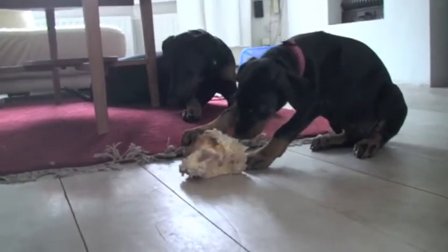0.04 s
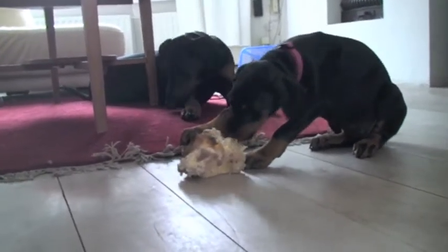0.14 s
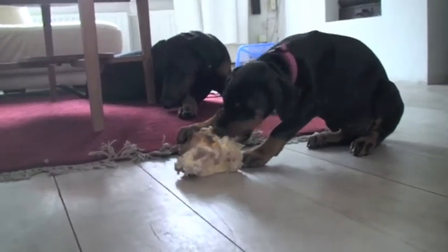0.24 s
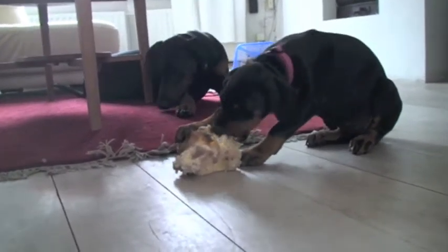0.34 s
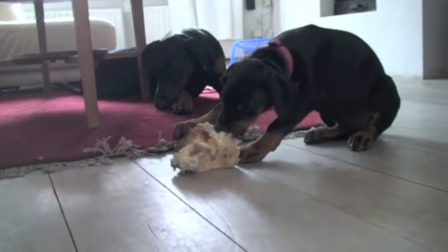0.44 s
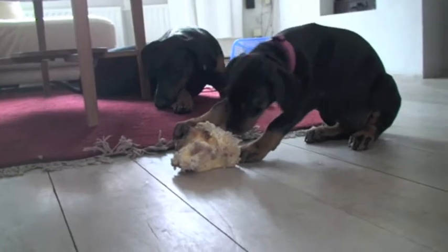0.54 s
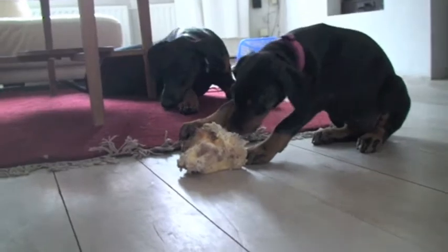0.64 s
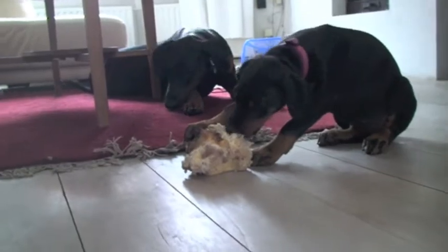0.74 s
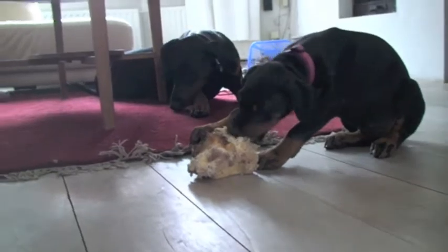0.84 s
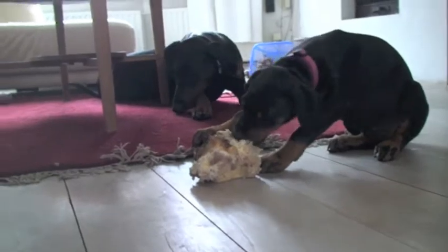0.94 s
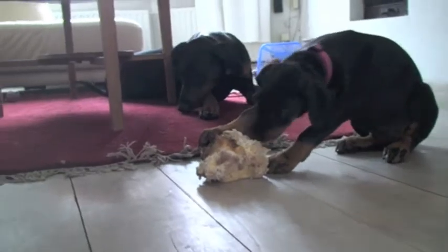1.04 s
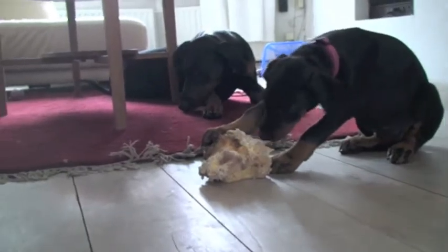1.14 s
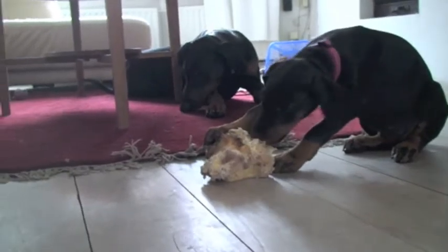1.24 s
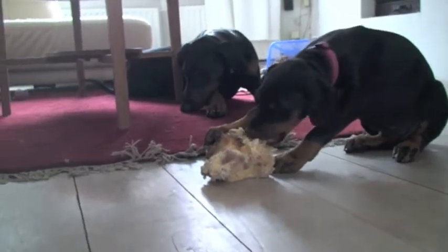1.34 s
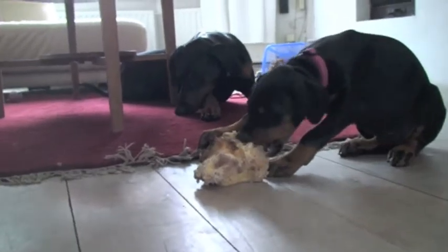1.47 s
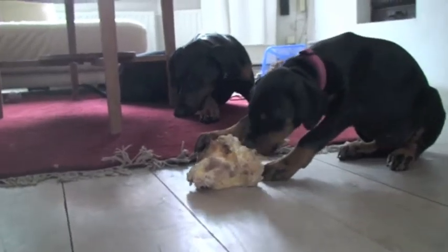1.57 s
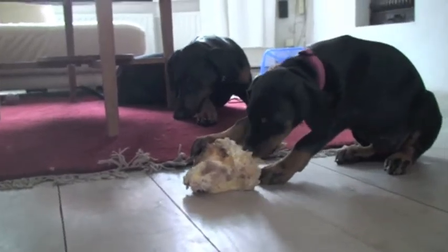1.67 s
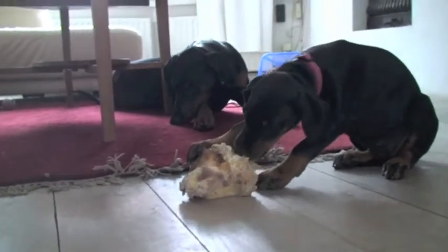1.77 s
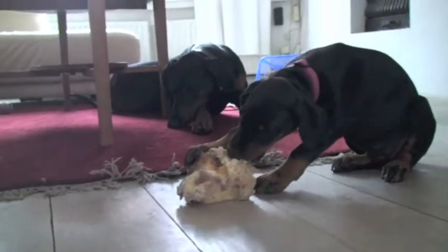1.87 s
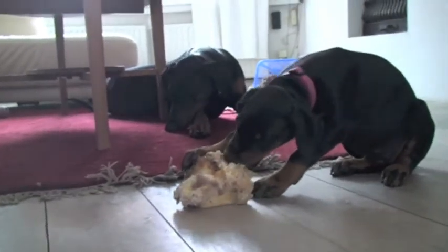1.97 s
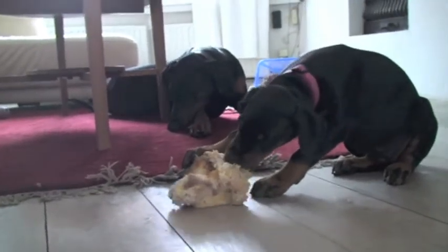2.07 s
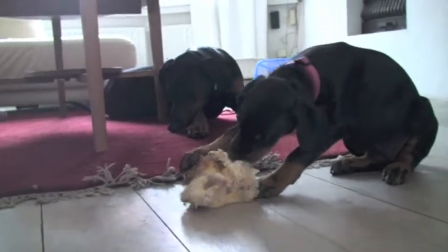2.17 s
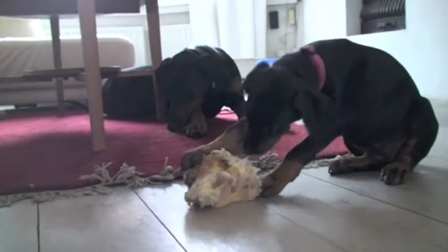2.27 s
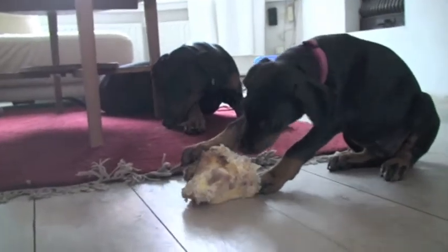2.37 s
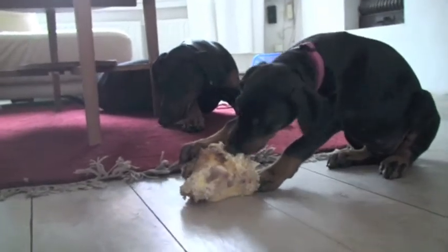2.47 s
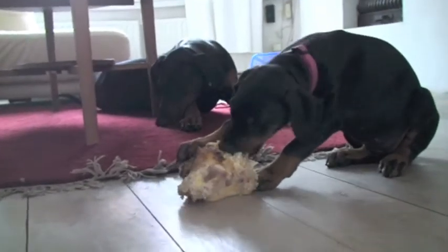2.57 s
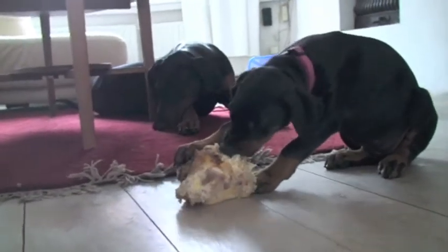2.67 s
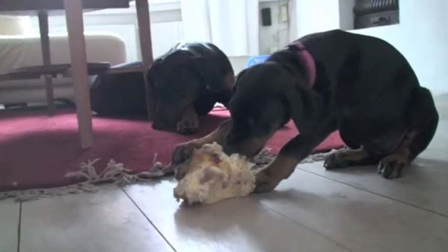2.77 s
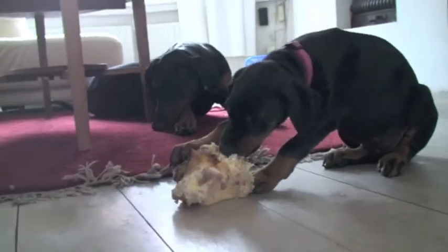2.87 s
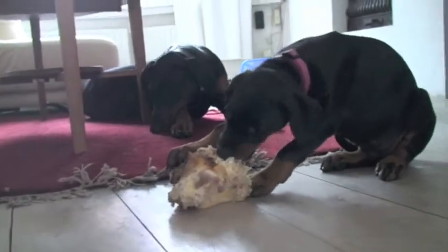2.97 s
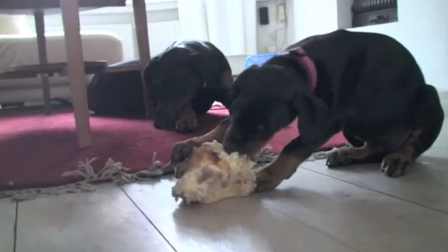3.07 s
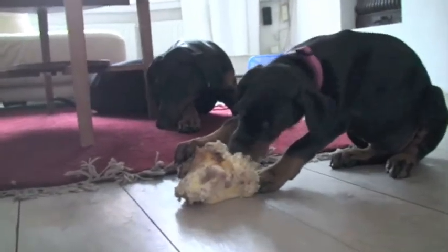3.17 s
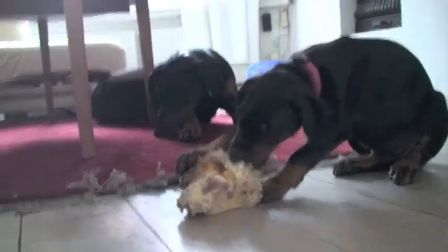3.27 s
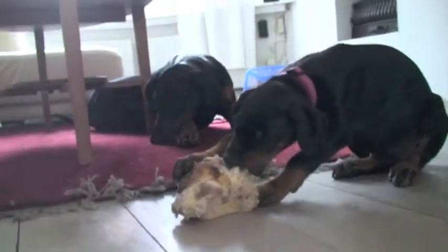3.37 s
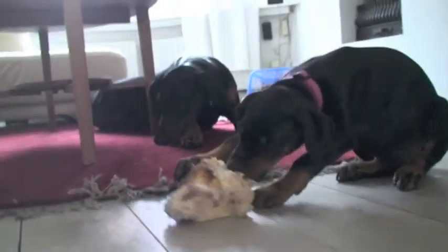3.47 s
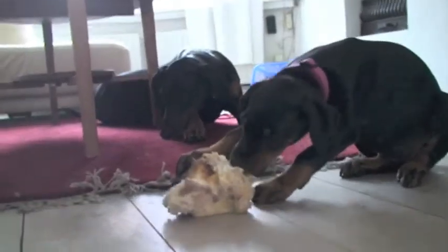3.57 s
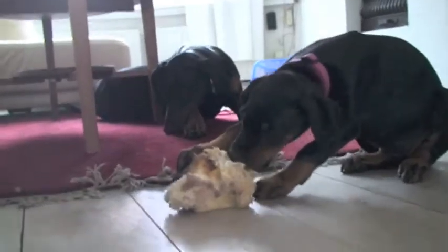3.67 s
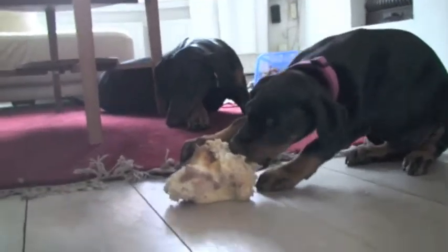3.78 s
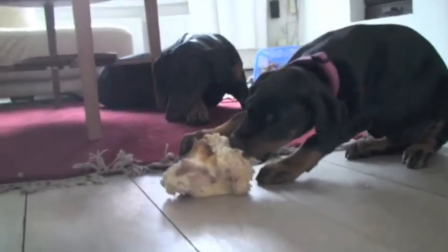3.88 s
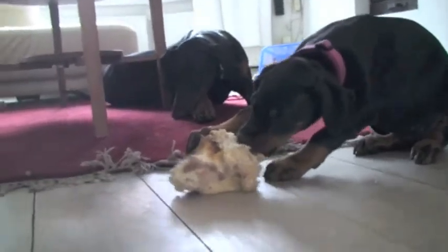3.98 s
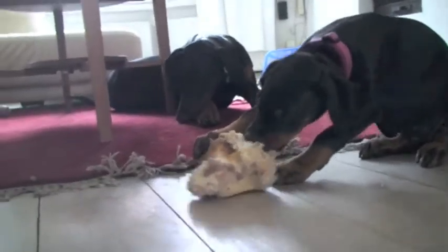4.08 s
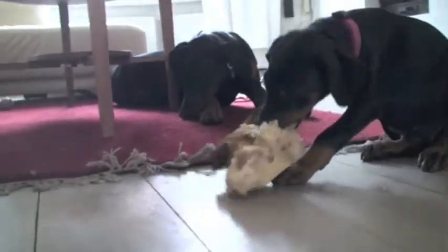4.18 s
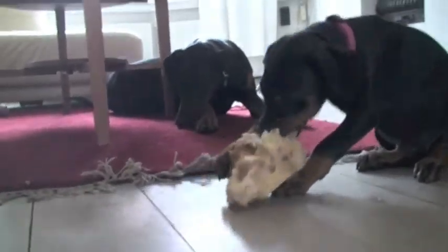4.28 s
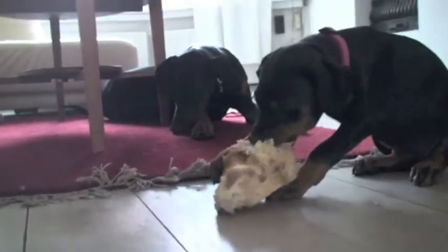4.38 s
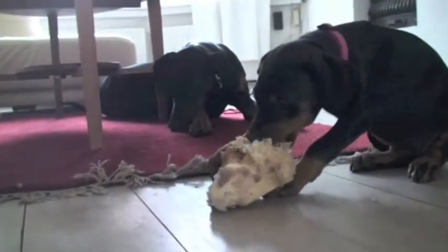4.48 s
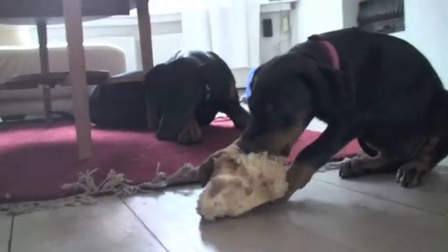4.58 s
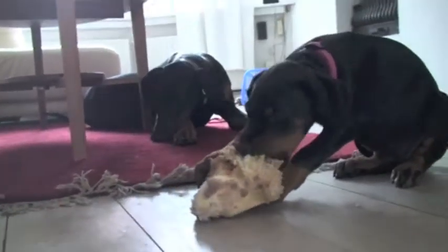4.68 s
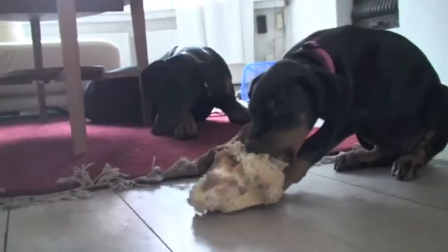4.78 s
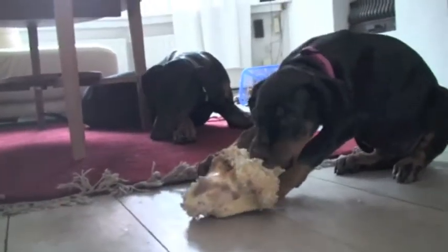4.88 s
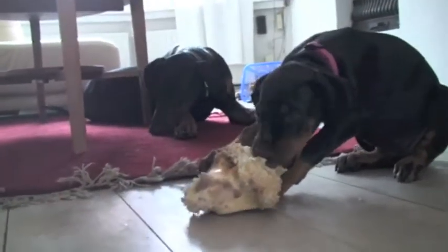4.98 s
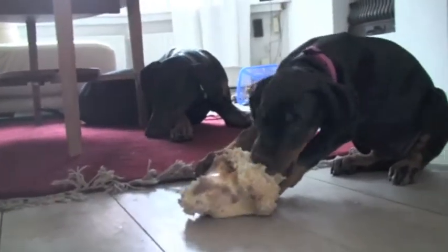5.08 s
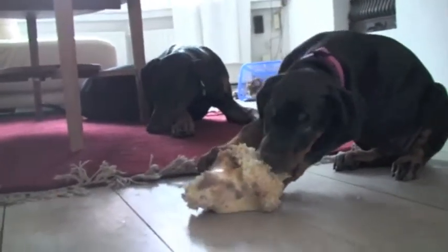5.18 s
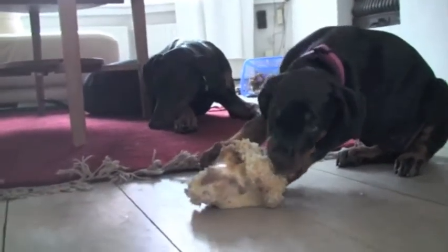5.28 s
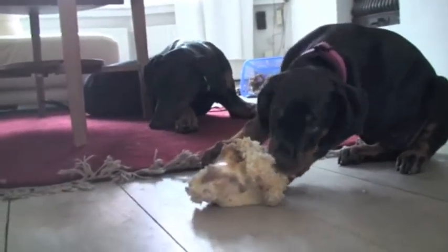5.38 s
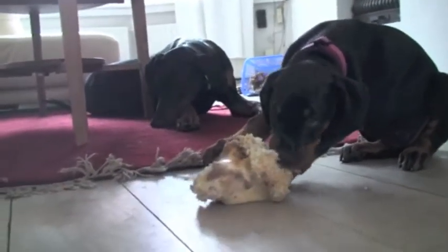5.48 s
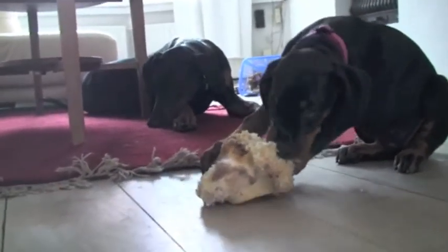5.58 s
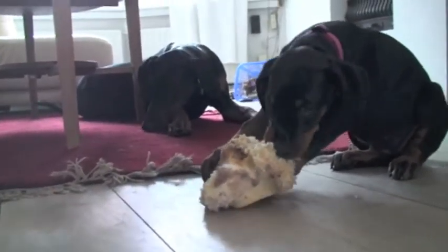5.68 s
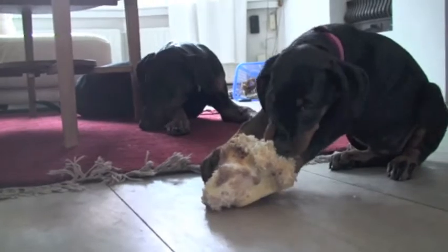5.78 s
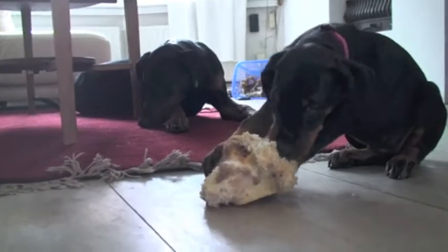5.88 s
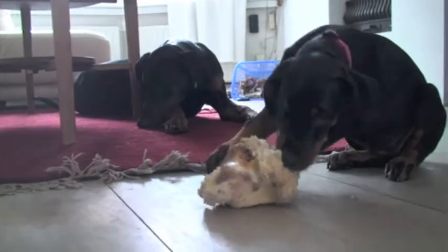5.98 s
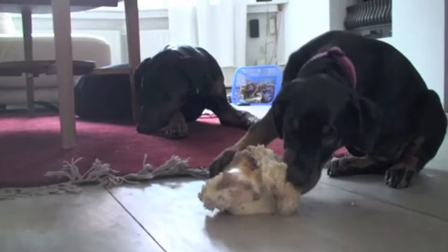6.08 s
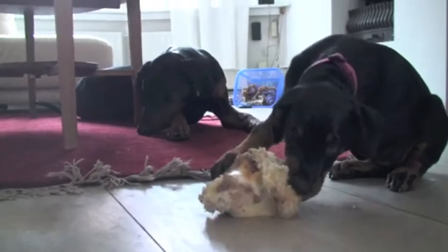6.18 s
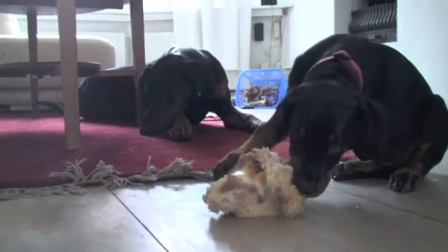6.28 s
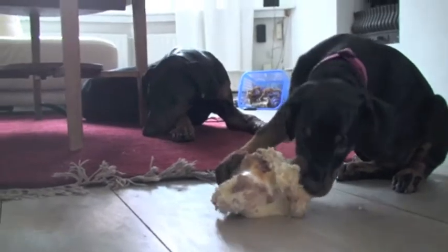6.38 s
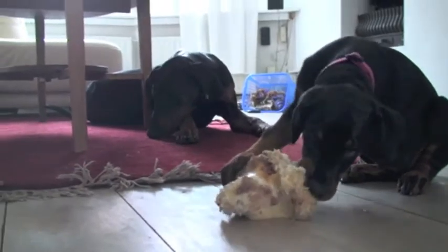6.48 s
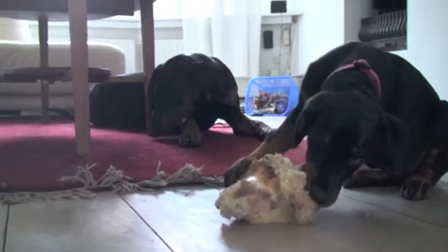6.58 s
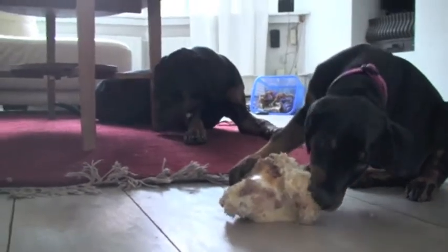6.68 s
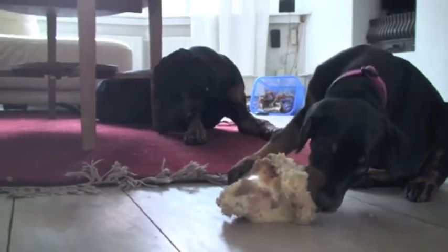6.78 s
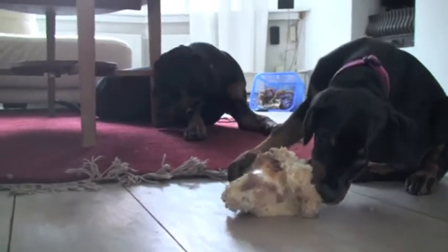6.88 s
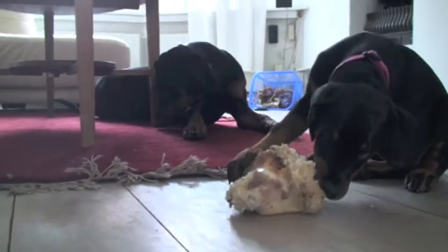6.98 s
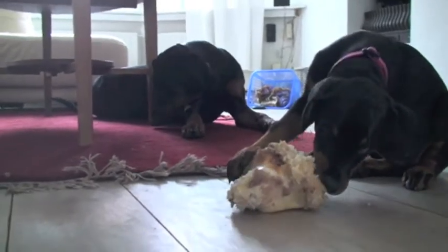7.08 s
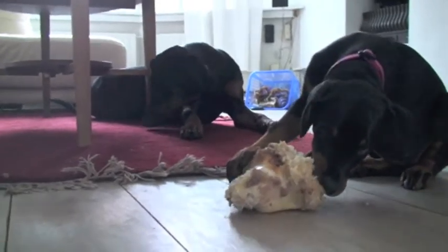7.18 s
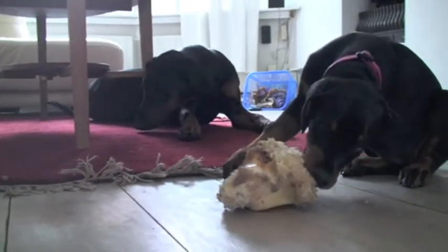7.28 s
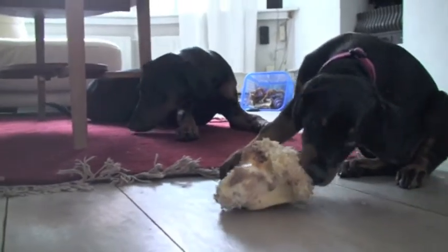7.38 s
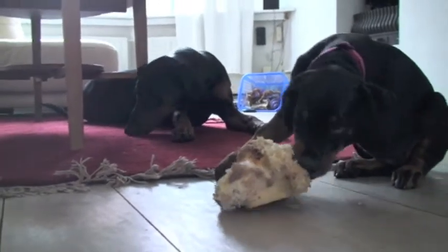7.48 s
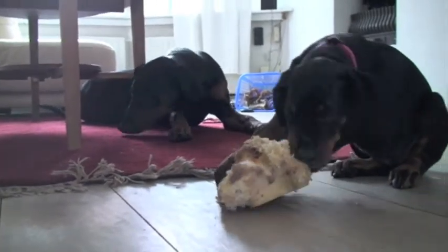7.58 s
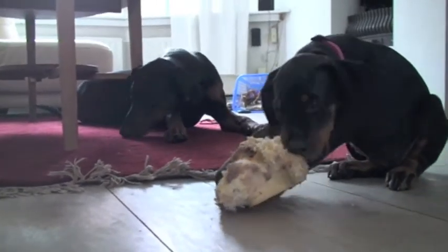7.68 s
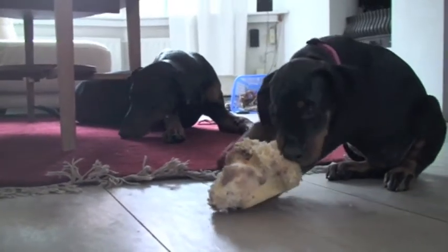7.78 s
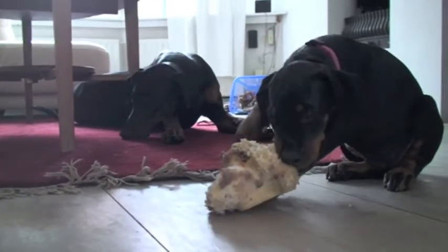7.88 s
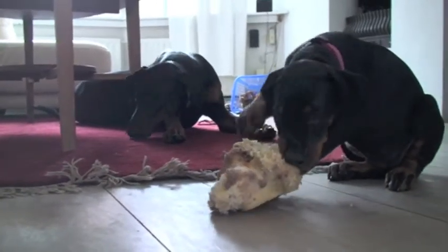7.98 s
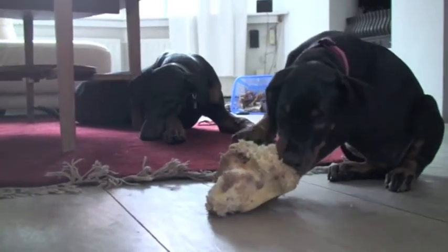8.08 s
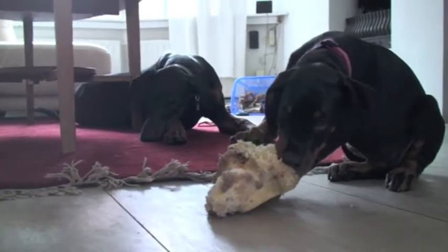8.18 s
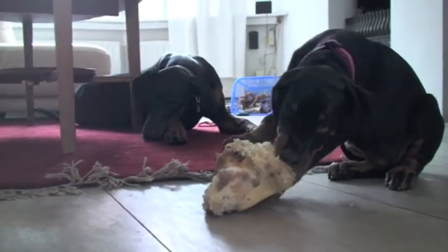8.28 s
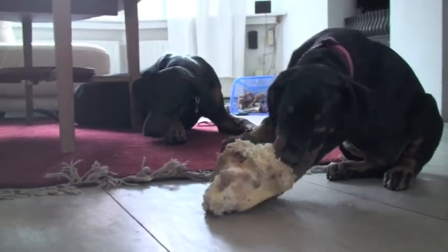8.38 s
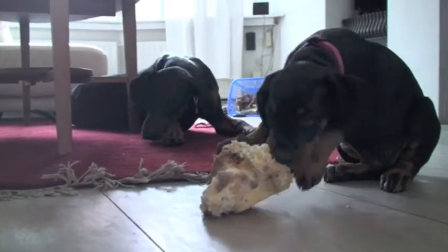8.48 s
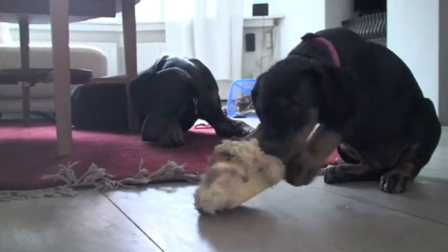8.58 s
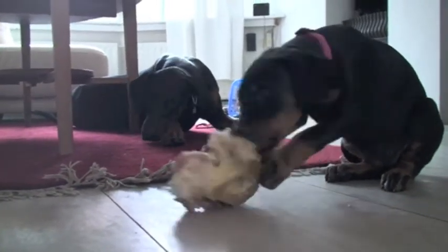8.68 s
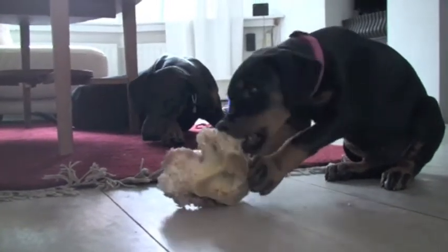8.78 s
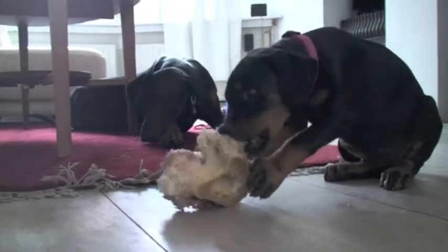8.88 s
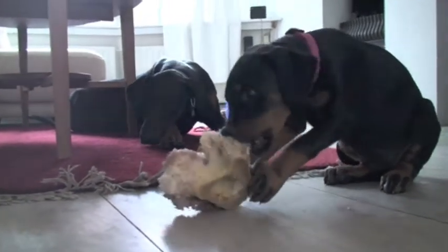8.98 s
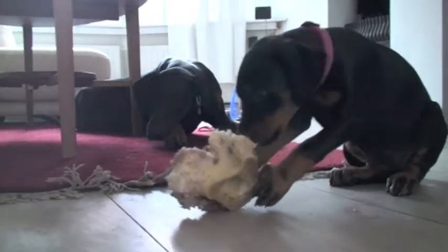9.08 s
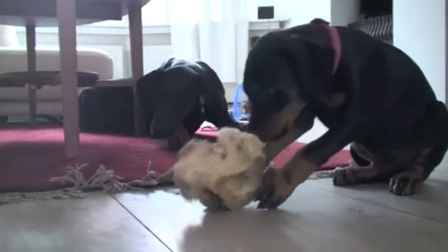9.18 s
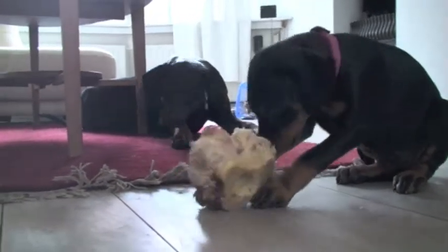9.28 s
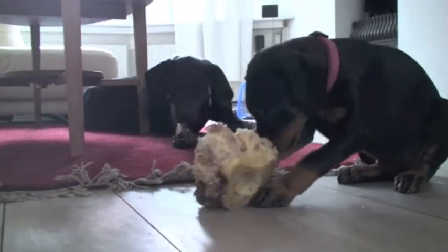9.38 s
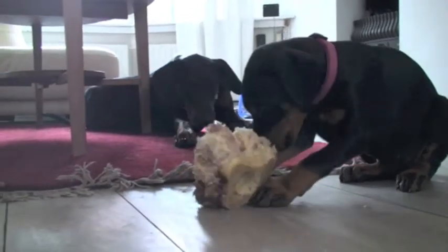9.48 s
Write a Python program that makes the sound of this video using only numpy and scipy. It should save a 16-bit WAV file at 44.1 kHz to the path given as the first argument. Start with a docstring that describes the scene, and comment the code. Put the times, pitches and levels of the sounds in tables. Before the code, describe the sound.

A dog gnaws a large bone on a hard floor, heard very close, in a quiet, lightly echoing room with soft hush and a barely audible steady high tone. From 0 to 2 seconds there are airy nose puffs, small bright tooth ticks and faint rubbing. At about 2.2 the bone knocks hollowly with a short scrape; near 2.7 come a tiny soft groan and a squeaky wet click. Smacks follow at 3 to 3.3, knocks at 3.5. From 3.9 to 5 it gets busy: grinding drags, a strong scrape and puff at 4.2, a solid knock at 4.6, crisp clicks at 4.9. Dragging returns at 5.5, then the loudest, sharp knock at 6.1. Lighter ticks and bumps continue through 7, a low thud lands at 8.1, dull bumps follow, and at 9.2 to 9.4 a rough scrape, knocks and snuffling end it.

```python
"""A quiet room with a board floor: a dog gnaws a large bone close to a microphone lying on the same boards.
Behind it lie a still hush and a thin steady tone; sparse echoes of random sign make the room answer.
Air hisses in the nose as noise in a moving resonance, and a soft groan is a wavering stack of sines.
Teeth, tongue and mouth tick and smack as short snaps with gritty rings.
The bone knocks and grinds on the boards: blows and uneven slips set off dying sines, one for each mode."""
import sys
import numpy as np
from scipy import signal
from scipy.fft import rfft, irfft
from scipy.io import wavfile
from scipy.ndimage import uniform_filter1d

SR = 44100
rng = np.random.default_rng(int(sys.argv[2]) if len(sys.argv) > 2 else 0)


def wav_record(signal):
    """Record a signal, one row per channel, as 16-bit PCM in the file named by sys.argv[1]."""
    frames = np.transpose(np.atleast_2d(signal))
    bounded = np.clip(frames, -1, 1)
    # unit amplitude maps onto the largest positive 16-bit level
    quanta = np.round(bounded * 32767).astype(np.int16)
    wavfile.write(sys.argv[1], SR, quanta)


N = 420713  # length in samples


def gain_of(db):
    """Decibels to gain."""
    return 10 ** (np.asarray(db) / 20)


def evened(x):
    """Scales to rms 1."""
    return x / np.sqrt(np.mean(x ** 2) + 1e-20)


def read(points, hz):
    """Reads a table on a log-frequency axis."""
    f, value = np.transpose(points)
    return np.interp(np.log(hz + 1), np.log(f + 1), value)


def add(mix, s, sound):
    """Mixes a sound in at s seconds, cut off at the end of the mix."""
    part = mix[..., round(s * SR):][..., :sound.shape[-1]]
    part += sound[..., :part.shape[-1]]


def resonate(x, hz, width):
    """A resonance of gain 1: shifts hz down to zero, smooths, and shifts back; hz may be a moving curve."""
    turn = np.exp(2j * np.pi * np.cumsum(hz * np.ones(len(x))) / SR)
    r = np.exp(-np.pi * width / SR)
    return 2 * (turn * signal.lfilter([1 - r], [1, -r], x / turn)).real


def leaned(lean_db):
    """Gains for left and right that share out a lean in dB, left minus right."""
    return gain_of(lean_db * np.array([.5, -.5])[:, None, None])


# Colour of the still room. Each row: frequency in Hz, relative level in dB per Hz.
HUSH = [(12, -44.5), (20, -6.5), (65, -1), (301, -0.5), (459, 1), (698, 0), (759, 3), (1000, -2.5),
        (1220, 0), (1860, -6.5), (2530, -7.5), (3070, -10), (11800, -23), (14300, -20.5), (16000, -42)]
# How alike the hush is at both ports. Each row: frequency in Hz, likeness (0-1).
HUSH_SAME = [(60, 0.145), (180, 0.263), (550, 0.296), (1650, 0.279), (4970, 0.059), (15000, 0.11)]
# Lean of the hush, used for the far echo too. Each row: frequency in Hz, left minus right in dB.
HUSH_LEAN = [(60, -20.5), (120, -3), (240, 0.5), (480, 5), (950, 4), (1890, 4.5), (3770, 3.5), (7520, 2.5),
             (15000, -5)]
HUSH_DB = -52  # rms over both channels


def hush():
    """The still room: random short-time spectra, partly alike at both ports, with faint drifting patches."""
    frames, hz = N // 256 + 5, np.fft.rfftfreq(1024, 1 / SR)
    a, b, c, d, patches = rng.standard_normal((frames, 513, 5)).T
    patches = evened(uniform_filter1d(uniform_filter1d(patches, 12, 0), 14, 1))
    same = read(HUSH_SAME, hz)[:, None]
    left = a + 1j * b
    right = same * left + np.sqrt(1 - same ** 2) * (c + 1j * d)
    z = np.array([left, right]) * gain_of(read(HUSH, hz)[:, None] + 1.896 * patches)
    z *= leaned(read(HUSH_LEAN, hz)[:, None])
    return gain_of(HUSH_DB) * evened(signal.istft(z, nperseg=1024, noverlap=768)[1][:, :N])


WHINE_HZ, WHINE_DB = 2522.5, -72.5  # level is rms


def whine():
    """A thin steady tone: one sine."""
    return gain_of(WHINE_DB) * np.sqrt(2) * np.sin(2 * np.pi * WHINE_HZ * np.arange(N) / SR)


# How the ports weigh a near source. Each row: frequency in Hz, left minus right in dB.
NEAR_LEAN = [(60, -13.5), (110, -14.5), (200, -8), (380, -4.5), (700, -2.5), (1290, -4.5), (2380, -9),
             (4400, -13), (8120, -3), (15000, 1)]
# Phase between the ports. Each row: frequency in Hz, radians by which the left leads.
NEAR_LEAD = [(60, -1.2), (340, -1.49), (700, -0.975), (1200, -1.21), (2500, -1.41), (6000, 1), (12000, 1)]


def ports(x):
    """Two microphone ports hear a near source with their own lean and phase; their mean keeps the level."""
    hz = np.fft.rfftfreq(N, 1 / SR)
    left = gain_of(read(NEAR_LEAN, hz)) * np.exp(1j * read(NEAR_LEAD, hz))
    both = np.array([left, np.ones_like(left)])
    return irfft(rfft(x) * both * 2 / abs(1 + left), N)


# Length of the echo. Each row: frequency in Hz, time to fall 60 dB in seconds.
ROOM = [(60, 0.654), (200, 0.559), (700, 0.629), (2000, 0.773), (5000, 0.262), (12000, 0.31)]
# Strength of the echo. Each row: frequency in Hz, echo against direct sound in dB.
ROOM_DB = [(60, -1.5), (300, -8.5), (700, -12), (1100, -7.5), (1600, -9), (2500, -2), (4000, -0.5),
           (10000, -28)]
# Echo from the dog's side. Each row: frequency in Hz, share of the echo's power (0-1).
ROOM_NEAR = [(60, 0.72), (300, 0.14), (1000, 0.8), (3000, 0.62)]


def room(x):
    """Sparse taps of random sign swell in over some milliseconds; each band dies at its own speed."""
    taps = np.zeros((3, SR))  # left, right, the dog's side
    at = np.arange(300, SR - 20, 20) + rng.integers(0, 20, (3, (SR - 301) // 20))
    np.put_along_axis(taps, at, rng.choice([-1., 1.], at.shape), 1)
    hz, t, z = signal.stft(taps, SR, nperseg=256)
    t60, share = read(ROOM, hz)[:, None], read(ROOM_NEAR, hz)[:, None]
    swell = 1 - np.exp(-t / 0.0131)
    z *= gain_of(read(ROOM_DB, hz)[:, None] - 60 * t / t60) * swell
    z /= np.sqrt(t60 * 2000 / np.log(1e6))  # a longer echo is not a stronger one
    z[:2] *= np.sqrt(1 - share) * leaned(read(HUSH_LEAN, hz)[:, None])
    z[2] *= np.sqrt(share)
    wet = signal.oaconvolve(x[None], signal.istft(z, SR, nperseg=256)[1], axes=1)[:, :N]
    return wet[:2] + ports(wet[2])


# First returns from nearby surfaces. Each row: delay in seconds, level against the direct sound in dB.
ECHOES = [(0.0151, -29.5), (0.0185, -22.5), (.034, -23)]


def walls(x):
    """Single echoes from the nearest walls and furniture, added to the direct sound."""
    out = x.copy()
    for s, db in ECHOES:
        add(out, s, gain_of(db) * x)
    return out


# A soft groan as a curve. Each row: time in seconds, pitch in Hz, rms level of the fundamental in dB.
GROAN = [(2.6, 295.4, -64), (2.644, 282.3, -58), (2.666, 237.9, -55.5), (2.754, 238.3, -56),
         (2.782, 310, -64.5), (2.83, 253.3, -57), (2.86, 256, -66)]


def groan():
    """A soft closed-mouth groan: a wavering fundamental with weak overtones; gives its start and sound."""
    s, hz, db = np.transpose(GROAN)
    t = np.arange(s[0], s[-1], 1 / SR)
    waver = 1 + 1.005 * uniform_filter1d(rng.standard_normal(len(t)), 200)
    turns = np.cumsum(np.interp(t, s, hz) * waver) / SR
    voice = sum(gain_of(-9. * k) * np.sin(2 * np.pi * (k + 1) * turns) for k in range(4))
    fade = signal.windows.tukey(len(t), .2)
    return s[0], np.sqrt(2) * gain_of(np.interp(t, s, db)) * voice * fade


# Puffs of air through nose and lips. Each row: peak time in seconds, rise and fall in seconds per 20 dB,
# level in dB, centre in Hz, level of the topmost hiss in dB, narrowing of the nostrils (0-1).
PUFFS = [(.003, .1, 0.16, -57.5, 5600, -65, 0), (.32, 0.187, .2, -66, 6500, -65, .3),
         (.5, 0.161, 0.253, -56, 6100, -61.5, 0), (1.09, 0.276, 0.102, -59, 6243, -62.5, 0.095),
         (1.72, 0.293, 0.1343, -56, 6240, -67, 0.026), (2.23, 0.2557, 0.121, -54.5, 5900, -56.5, 0.049),
         (2.36, 0.289, 0.62, -64, 4980, -77.5, 0.023), (2.56, 0.09, 0.33, -63, 6100, -64, 0),
         (2.74, 0.052, 0.037, -48.5, 5480, -69, 0), (2.87, 0.213, 0.71, -58, 5728, -62.5, 0.13),
         (3.21, 0.024, 0.3, -62.5, 5200, -61, 0.089), (3.5, 0.176, 0.22, -62.5, 6300, -59, 0.32),
         (3.75, 0.27, 0.099, -60.5, 5760, -63.5, 0), (3.85, 0.033, 0.2057, -62, 6100, -60.5, 0.029),
         (3.96, 0.157, 0.051, -55.5, 6666, -59.5, 0.074), (4.09, .4, 0.1852, -59.5, 5800, -60, 0),
         (4.215, 0.111, 0.138, -43.5, 4340, -64, 0.53), (4.33, 0.0844, 0.204, -51, 5300, -61, 0.17),
         (4.51, 0.04, 0.083, -60, 5950, -68.5, 0.11), (4.62, 0.32, 0.57, -67, 5373, -65.5, 0.17),
         (4.82, 0.053, 0.24, -61, 5900, -56.5, 0.38), (4.94, 0.134, 0.081, -52.5, 6850, -61, 0.31),
         (5.001, 0.11, 0.214, -53, 6730, -70, 0.071), (5.39, 0.044, 0.051, -59, 5240, -58.5, 0.55),
         (5.45, 0.025, 0.084, -53.5, 6788, -56, 0.22), (5.66, 0.347, 0.89, -60, 5438, -59, 0.366),
         (5.8, 0.32, 0.43, -57.5, 4830, -61, 1), (6.08, 0.47, 0.137, -63.5, 4860, -70, 0),
         (6.24, 0.39, 0.52, -63, 4710, -72.5, 0.013), (6.69, 0.404, 0.1634, -58, 5730, -68, 0.0065),
         (6.89, 0.178, 0.423, -59.5, 5464, -58.5, 0.33), (7.08, 0.421, 0.4084, -68, 4975, -76.5, 0.36),
         (7.41, .2, 0.19, -61, 6180, -60.5, 0.3), (7.86, 0.79, 0.063, -63, 5030, -64.5, 0.43),
         (7.99, 0.25, .5, -65, 5237, -68, 0.5), (8.42, 0.47, 0.38, -64.5, 5770, -64.5, 0.13),
         (8.77, 0.362, 0.224, -57, 4883, -59, 0.28), (8.93, 0.14, 0.163, -60.5, 5740, -76.5, 0),
         (9.11, 0.136, 0.1683, -49, 5140, -57, 0.91), (9.27, 0.08, 0.07946, -52, 4503, -58.5, 0.54),
         (9.38, 0.0715, 0.212, -54, 5480, -60, 0.38)]
# Wet fizz around each tick: level in dB at a loud tick, dB more per dB of tick, seconds per 20 dB.
SPRAY_DB, SPRAY_PER_DB, SPRAY_RISE_S, SPRAY_FALL_S = -60, 0.64, 0.0186, 0.046
LOUD_TICK_DB = -31.5  # the tick level at which fizz and ring have their set values
BUBBLES_PER_S = 60.


def flare(t, peak, rise, fall):
    """Power that climbs to a peak and falls off, both straight in dB (rise and fall in seconds per 20 dB)."""
    return gain_of(-20 * np.maximum((peak - t) / rise, (t - peak) / fall)) ** 2


def snuffle():
    """Turbulent air in a moving resonance, under a wet top hiss that spits with tiny bubbles."""
    t = np.arange(0, N + 64, 64) / SR
    s, rise, fall, db, centre_hz, top_db, narrowing = np.transpose(PUFFS)[:, :, None]
    shape = flare(t, s, rise, fall)
    power = shape * gain_of(db) ** 2 + 1e-30
    total = power.sum(0)
    when, tick_db = np.transpose(TICKS)[:2, :, None]
    spray_db = SPRAY_DB + SPRAY_PER_DB * (tick_db - LOUD_TICK_DB)
    spray = gain_of(spray_db) ** 2 * flare(t, when, SPRAY_RISE_S, SPRAY_FALL_S)
    top_power = (shape * gain_of(top_db) ** 2).sum(0) + spray.sum(0)
    # overlapping puffs share centre and narrowing by their power
    controls = (np.sqrt(total), (power * centre_hz).sum(0) / total,
                (power * narrowing).sum(0) / total, np.sqrt(top_power))
    level, hz, focus, top_level = (np.interp(np.arange(N) / SR, t, c) for c in controls)
    focus = np.clip(focus, 0, 1)
    bubbles = (rng.random(N) < BUBBLES_PER_S / SR) * rng.exponential(1, N)
    spit = uniform_filter1d(bubbles, 60) * 60.
    air = rng.standard_normal((3, N))
    wide = evened(resonate(resonate(air[0] * (1 + .2 * spit), hz, 6520), hz, 7370))
    narrow = evened(resonate(resonate(air[2], hz, 2230), hz, 2700))
    top_band = signal.butter(3, [7200, 14000], "band", fs=SR, output="sos")
    top = evened(signal.sosfilt(top_band, air[1] * (1 + spit)))
    return level * (np.sqrt(1 - focus) * wide + np.sqrt(focus) * narrow) + top_level * top


def clicks(table, cycles):
    """A short snap and a gritty ring at each click's pitch; the grit reaches each port partly unlike."""
    out, t = np.zeros((2, N)), np.arange(SR // 18) / SR
    grit = rng.standard_normal((len(table), 2, len(t)))
    for (s, db, hz, lean_db, t60, width), (a, b) in zip(table, grit):
        swell = t * hz / cycles  # the snap peaks after this many cycles
        snap = np.sin(2 * np.pi * hz * t) * swell * np.exp(1 - swell)
        width_hz = hz * width
        ring = np.array([evened(resonate(resonate(noise, hz, width_hz), hz, width_hz))
                         for noise in (a + 2.15 * b, a)])
        ring *= gain_of(-60 * t / max(t60, .001)) * (1 - np.exp(-t / 0.000594))
        port_db = db + np.array([[.5], [-.5]]) * lean_db
        add(out, s, gain_of(port_db) * (0.456 * snap + .5 * ring))
    return out


# Hollow smacks and squeaks of the mouth. Each row: start in seconds, relative level in dB, pitch in Hz,
# left minus right in dB, fall of the ring by 60 dB in seconds, ring width as a share of pitch.
SMACKS = [(.4447, -35.5, 1370, -2.5, 0.018, 0.307), (2.593, -42.5, 1050, -9.5, 0.024, 0.29),
          (2.7163, -36.5, 5320, -9, 0.05, 0.068), (2.7245, -36, 5413, -20.5, 0.079, 0.046),
          (2.844, -38.5, 1280, -7, 0.03, 0.29), (3.0465, -31.5, 2470, -10.5, 0.0234, 0.27),
          (3.0554, -33.5, 2246, -20.5, 0.0313, 0.35), (3.066, -37.5, 2110, -11, 0.065, 0.36),
          (3.2321, -31, 1750, -3, 0.019, 0.46), (3.2436, -31, 1537, -5.5, 0.0225, 0.167),
          (3.702, -42, 1500, -6.5, 0.0127, 0.833), (3.8665, -32, 3560, -8, 0.016, 0.74),
          (4.6414, -40.5, 1542, -14, 0.0227, 1.2), (4.8002, -33.5, 2500, -6.5, 0.016, 1.08),
          (5.1945, -40, 2960, -16.5, 0.032, 0.227), (6.0565, -35.5, 1266, -2.5, 0.023, 0.35),
          (7.814, -35.5, 699, -5.5, .015, 0.87), (9.0602, -34, 3420, -8, 0.0287, 0.36),
          (9.1144, -35, 1513, -4, 0.026, 0.305), (9.389, -33, 6500, -14, 0.014, 0.48)]


def smacks():
    """The mouth's hollow smacks and squeaks, each with its own ring."""
    return clicks(SMACKS, 1.185)


# Teeth and wet tongue. Each row: start in seconds, relative level in dB, pitch in Hz, left minus right in dB.
TICKS = [(0.209, -40.5, 9850, -2), (0.2671, -36.5, 8800, -1.5), (0.2994, -34, 7467, -4),
         (0.3299, -41.5, 6840, -5.5), (0.7647, -39.5, 8460, -2.5), (0.8093, -37, 10700, -2),
         (1.3534, -37.5, 12000, -3.5), (1.4015, -37, 9020, -4.0), (1.4339, -30, 10950, 1),
         (1.4589, -35.5, 10800, -1.5), (1.5806, -32.5, 11240, -1.5), (1.9443, -38.5, 10000, -2.0),
         (1.9649, -43.5, 8380, -2), (1.9936, -39.5, 10030, 1.5), (2.0642, -47.5, 4060, -3.0),
         (2.0827, -34.5, 8930, -2.5), (2.1364, -37.5, 10600, -5.5), (2.214, -35, 8070, -3.5),
         (2.538, -42, 5970, -12.5), (2.5546, -44.5, 11600, -7.5), (2.6653, -43.5, 3890, -1.5),
         (2.6886, -31.5, 9200, -4.5), (2.7244, -29.5, 5640, -14.5), (2.7247, -29.5, 5480, -12.5),
         (3.1714, -37, 10600, -3), (3.2086, -37, 9330, -7), (3.232, -40, 8590, -6.5),
         (3.3567, -34, 11780, -3.5), (3.4785, -45, 6180, -3), (3.4865, -40.5, 6350, -4),
         (3.5124, -39, 11100, -4.5), (3.5502, -34, 10820, -2.5), (3.702, -39.5, 3900, -4.0),
         (3.7303, -33, 8222, -2.5), (3.7941, -37.5, 8590, -4.5), (3.8279, -43.5, 4930, -1.5),
         (3.8445, -31, 7640, -5.5), (3.8548, -29.5, 9500, -0.5), (3.9265, -36, 10700, -4),
         (3.948, -27.5, 10330, -0.5), (4.0644, -35, 6450, -3), (4.1303, -38, 4100, -4),
         (4.156, -34.5, 4090, -9.5), (4.5116, -37.5, 7800, -6), (4.5121, -29, 7466, -5.5),
         (4.5703, -36.5, 4720, -3), (4.7561, -40, 6810, -3), (4.7994, -38, 4120, -3.5),
         (4.839, -38.5, 11000, -4.5), (4.8819, -34, 7210, -3.5), (4.9128, -25.5, 8100, -2.5),
         (4.9379, -26, 7300, -5.0), (5.0011, -31, 7290, -5), (5.1944, -44.5, 4710, -4.0),
         (5.3659, -48, 3800, -2), (5.3665, -37, 11380, -5.5), (5.3918, -35.5, 11400, -5.5),
         (5.437, -30, 7200, -6.5), (5.5202, -37.5, 9523, -4.0), (6.0911, -44.5, 3840, -10),
         (6.201, -39.5, 4600, -18), (6.4928, -39, 8100, -3), (6.54, -36.5, 5040, -8),
         (6.8029, -42, 7730, -3.5), (6.8219, -32, 10500, -4.5), (6.8587, -36.5, 10600, -5.5),
         (6.8725, -36, 4100, -4.5), (6.8802, -41.5, 4020, -4.5), (6.9346, -36.5, 5740, -5.0),
         (6.9536, -32.5, 6540, -7.5), (7.0036, -37.5, 9540, -4.5), (7.3861, -40.5, 5900, -7),
         (7.6556, -39.5, 8020, -3), (7.939, -37, 6877, -8), (7.9764, -41.5, 4870, -7.5),
         (8.9101, -36, 6430, -6), (9.0598, -30, 5650, -11), (9.2572, -35.5, 4506, -8),
         (9.3528, -36, 4600, -6.5), (9.37, -28, 3920, -11.5)]
TICK_T60_S, TICK_WIDTH, LONGER_PER_DB = 0.00728, 0.59, 0.1017  # louder ticks ring longer
FAINT_TICKS, FAINT_DB, FAINT_SPREAD_DB = 25, -52, 4.
FAINT_LOW_HZ, FAINT_HIGH_HZ, FAINT_LEAN_DB = 4027, 11050, -10


def ticks():
    """The clear ticks and a random scatter of faint ones, all with one kind of ring."""
    when, size, pitch = rng.random((FAINT_TICKS, 3)).T
    faint_db = FAINT_DB - FAINT_SPREAD_DB * np.log(1 - 0.89 * size)
    faint_hz = FAINT_LOW_HZ * (FAINT_HIGH_HZ / FAINT_LOW_HZ) ** pitch
    faint = np.transpose([when * N / SR, faint_db, faint_hz, np.full(FAINT_TICKS, FAINT_LEAN_DB)])
    table = []
    for s, db, hz, lean_db in [*TICKS, *faint]:
        t60 = TICK_T60_S * np.exp(LONGER_PER_DB * (db - LOUD_TICK_DB))
        table.append((s, db, hz, lean_db, t60, TICK_WIDTH))
    return clicks(table, 0.958)


# Modes of boards and bone. Each row: frequency in Hz, width in Hz, relative level in dB.
BOARDS = [(74.6, 10.1, 0), (94.5, 10.1, -10), (154.84, 28.45, -6.5), (203.4, 42.9, -2.5), (255.5, 85, 2.5),
          (355.4, 82, 3.5), (502.8, 133.3, 1), (640.2, 173, 7), (787.6, 133.3, 2), (1009.7, 397, 4),
          (1232.2, 244, 3.5), (1437.7, 180, 0), (1598, 188, -10), (1751, 594, 4.5), (2330, 200, -13),
          (2757, 352, -7.5), (3032, 980, -4.5), (4300, 980, -78)]


def rings(t):
    """One dying sine for each mode of boards and bone; a wider mode dies sooner."""
    hz, width, db = np.transpose(BOARDS)[:, :, None]
    swell = 1 - np.exp(-t * hz * 2.276)
    return gain_of(db) * np.exp(-np.pi * width * t) * np.sin(2 * np.pi * hz * t) * swell


# The bone is dragged or rocked over the boards. Each row: start, swell and hold in seconds, release in
# seconds per 20 dB before the family's share (its sign has no effect), body level in dB, then thud, ring
# and rasp against the body in dB.
DRAGS = [(0.429, .03, .12, -2.5, -72, -11, 11, 8), (0.968, 0.062, 0.065, -0.63, -65, -21, 3.5, -2.5),
         (1.499, 0.0787, 0.0124, -0.2268, -50, -6.5, -0.5, -8),
         (2.038, 0.0492, 0.0068, 0.05, -38.5, -16, -3.5, -9.5),
         (2.154, 0.037, 0.1014, 0.16, -41, -21.5, -3, -11.5),
         (2.186, 0.0663, .008, 0.1125, -40.5, -23, 12, 2.5),
         (3.382, 0.0324, 0.1555, 0.0443, -45.5, -26.5, -8.5, -17),
         (3.422, 0.0962, 0.0243, -0.055, -42.5, -23.5, 10, -3.5),
         (3.727, 0.0727, 0.0085, 0.1, -53, -15, -1, -4),
         (3.894, 0.0322, 0.0105, 0.0332, -34.5, -27.5, -2.5, -15),
         (4.004, 0.1539, 0.0175, -0.0188, -32.5, -33.5, 2.5, -3.5),
         (4.1, 0.0975, 0.0173, -0.0264, -37, -30, 12.5, 14),
         (4.202, 0.0251, 0.011, 0.0512, -26, -21, -6.5, -6),
         (4.385, 0.0133, 0.026, -0.38, -52.5, -12, -10.5, -18),
         (4.582, 0.01025, .03, -0.07, -41, -12.5, -15.5, -24),
         (4.721, 0.0215, 0.023, 0.07, -54.5, 1.5, -8, -15),
         (4.778, 0.0352, 0.0314, 0.102, -41, -13, -5, -16), (4.932, 0.025, 0.089, 0.21, -65.5, 2.5, 4, 5.5),
         (5.5, 0.097, 0.0383, 0.0371, -40.5, -29.5, -1, -10.5),
         (5.593, 0.0735, 0.0182, .12, -35.5, -28, -1.5, -13.5),
         (5.81, 0.0138, 0.0077, 0.2, -47, -8.5, -5.5, -6), (5.931, 0.0084, 0.0146, 1, -48, -9.5, -15, -22),
         (6.496, 0.011, 0.045, -0.2, -55.5, -5.5, -9, -11),
         (6.574, 0.0193, 0.0093, 0.17, -50, -16.5, -1.5, -4),
         (6.763, 0.0062, 0.006, -1.3, -45.5, -17, -16, -17),
         (6.867, 0.0275, 0.06, -0.12, -57.5, -12.5, -5, -0.5),
         (7.02, 0.007, 0.0065, 0.18, -50, -13, -4.5, -19.5),
         (7.077, 0.059, 0.0077, 0.91, -60.5, -9, -4, -9.5),
         (7.548, 0.03052, 0.025, 0.0726, -42, -28.5, -3.5, -14.5),
         (7.597, .07, 0.0085, 0.092, -39, -19, -5.5, -12),
         (7.836, 0.00613, 0.0274, 0.03, -36.5, -6, -8, -12),
         (8.119, 0.0092, 0.029, 0.06, -44.5, -14.5, -12.5, -25.5),
         (8.199, 0.0204, 0.0041, 0.08, -48.5, -20, -2, -18.5),
         (8.266, 0.049, 0.0077, 0.02, -48.5, -19, -17.5, -28),
         (8.388, 0.038, 0.0096, 0.1409, -55.5, -0.5, -9, -4.5),
         (8.602, 0.0155, 0.0187, 0.27, -56, -6.5, -15.5, -9.5),
         (8.684, 0.0663, 0.0067, 0.1166, -41, -8.5, -5, -13.5),
         (8.893, 0.0064, 0.0072, 0.0734, -42, -5, -16.5, -14.5),
         (8.928, 0.0116, .05, 0.45, -60, -7, -16, -23), (9.068, 0.0403, 0.00825, 0.1, -57.5, -1, -0.5, -10),
         (9.206, 0.0237, 0.018, 0.01, -36.5, -17, -3, -9),
         (9.225, 0.03965, 0.0086, 0.0421, -27.5, -16, 1.5, -3.5),
         (9.331, 0.044, 0.0083, -0.07, -44.5, -11, -17.5, -15),
         (9.392, 0.021, 0.0077, 0.48, -51.5, -4.5, 1, -6.5)]
# How body, thud, ring, rasp and edge follow a drag. Each row: power of the swell (higher comes later),
# share of the release time.
FAMILY_RULES = [(1.32, 0.878), (2.66, 1.3), (1.694, 0.72), (2.28, 0.84), (2.66, 0.56)]
EDGE_DB, EDGE_PER_DB = -14, 0.86  # the edge against the body: dB at a rasp of 0 dB, dB per dB of rasp


def force(family):
    """The push on one family of modes: each drag swells, holds and lets go at that family's own pace."""
    out, (late, lasting) = np.zeros(N), FAMILY_RULES[family]
    t = np.arange(SR // 2) / SR
    for s, swell, hold, release, db, *shares_db in DRAGS:
        edge_db = EDGE_DB + EDGE_PER_DB * shares_db[-1]
        share_db = [0, *shares_db, edge_db][family]
        onset = np.minimum(t / swell, 1) ** late
        let_go = gain_of(-20 * np.maximum(t - swell - hold, 0) / abs(release * lasting))
        add(out, s, gain_of(db + share_db) * onset * let_go)
    return out


# The families body, thud, ring, rasp and edge, in that order. Each row: lower and upper bound in Hz.
FAMILIES = [(130, 480), (50, 130), (480, 1100), (1100, 1800), (1800, 5000)]
SLIPS_PER_S, SLIP_SPREAD_DB, LUMPS_DB = 1900., 3, 1.27


def drags():
    """Uneven slips of the rough bone tap the boards in lumps; five mode families follow their own force."""
    modes, hz, out = rings(np.arange(SR // 10) / SR), np.array(BOARDS)[:, 0], np.zeros(N)
    size = gain_of(SLIP_SPREAD_DB * np.minimum(rng.exponential(1, N), 3)) * rng.choice([-1, 1], N)
    lumps = gain_of(LUMPS_DB * evened(uniform_filter1d(rng.standard_normal(N), size=300)))
    slips = evened((rng.random(N) < SLIPS_PER_S / SR) * size * lumps)
    for family, (low, high) in enumerate(FAMILIES):
        body = modes[(hz >= low) & (hz < high)].sum(0)
        band = signal.butter(2, [0.976 * low, 1.145 * high], "band", fs=SR, output="sos")
        body = signal.sosfilt(band, body)
        out += signal.oaconvolve(slips * force(family), body / np.linalg.norm(body))[:N]
    return out


# The bone drops or rocks on the boards. Each row: start in seconds, blow strength in dB, pitch that rings
# most in Hz, fall below and above that pitch in dB per octave.
KNOCKS = [(.29, -40.5, 186, 8.2, 7.6), (2.158, -32.5, 250, 8, 4.7), (2.221, -19.5, 466.2, 12, 3.4),
          (2.256, -8, 846, 9.5, 14.1), (3.465, -27, 480, 9.4, 14.7), (3.5, -22, 387, 4.8, 11.6),
          (3.931, -30, 520, 7.9, 10), (3.779, -37, 373.8, 15.4, 21), (4.225, -17.5, 372.2, 6.4, 8),
          (4.573, -11.5, 337, 3.7, 16.7), (4.807, -36.5, 175, 14.5, 7), (4.93, -37.5, 121, 9.8, 5.5),
          (5.067, -37, 118, 8.4, 12.7), (5.183, -32, 149.5, 10.2, 9.3), (5.365, -39.5, 174, 6.5, 12),
          (5.685, -28, 330, 9, 11.71), (5.824, -32, 339, 11, 13.3), (5.93, -18, 344, 1.97, 9.64),
          (6.092, -3.5, 672.7, 5.22, 4.64), (6.112, -23, 700, 8, 9.4), (6.496, -24, 206, 5.5, 5.86),
          (6.595, -29, 382, 9.4, 9.3), (6.768, -26.5, 389, 9.6, 6.15), (6.84, -31.5, 215, 9.2, 4.4),
          (6.946, -39.5, 198, 10, 2.4), (7.022, -23, 407, 17, 8.4), (7.839, -21.5, 150, 9.2, 1.98),
          (8.107, -10, 158.5, 14.1, 7.07), (8.218, -26.5, 207, 13.6, 6.65), (8.285, -33.5, 253, 9.4, 12.6),
          (8.324, -27, 167.4, 17.3, 13.6), (8.419, -34.5, 144, 12.5, 6.1), (8.627, -34, 163, 8.8, 10),
          (8.755, -26.5, 140, 11.7, 6.6), (8.898, -22, 175.3, 13.2, 11.26), (9.263, -18.5, 700, 6.8, 5.8),
          (9.368, -19.5, 1443, 11.5, 8.8)]
KNOCK_T60_S, CONTACT_MS = 0.072, 0.0797  # damping by the resting bone; width scale of the push


def knocks():
    """Each blow lands on another spot and favours modes near its own pitch; the resting bone damps them."""
    t, hz, out = np.arange(SR // 8) / SR, np.array(BOARDS)[:, 0], np.zeros(N)
    modes, signs = rings(t), rng.choice([-1., 1.], (len(KNOCKS), len(BOARDS)))
    push = np.exp(-(t[:200] * 1000 / CONTACT_MS - 2.5) ** 2)  # a longer contact cannot drive high modes
    damping = gain_of(-60 * t / KNOCK_T60_S)
    for (s, db, pitch_hz, under_db, over_db), sign in zip(KNOCKS, signs):
        fall_db = abs(np.where(hz < pitch_hz, under_db, over_db) * np.log2(hz / pitch_hz))
        ring = np.convolve((sign * gain_of(-fall_db)) @ modes * damping, push)
        # at 0 dB a blow has the energy of 2.56 ms of a sine of peak 1
        add(out, s, gain_of(db) * ring / np.linalg.norm(ring) * np.sqrt(0.00256 * SR / 2))
    return out


TEETH_DB, SMACKS_DB = 4, 0.5  # teeth: level of all the ticks together; smacks: send to the room only


def scene():
    """Bone and dog, near and through the room, over the hush."""
    near = knocks() + snuffle() + drags()
    add(near, *groan())
    no_bass = signal.butter(3, 60, "high", fs=SR, output="sos")  # the near sounds carry no deep bass below 60 Hz
    near = signal.sosfilt(no_bass, near)
    teeth, mouth = gain_of(TEETH_DB) * ticks(), smacks()
    # smacks face away, so the room gets a little more of them
    sent = near + teeth.mean(0) + gain_of(SMACKS_DB) * mouth.mean(0)
    return ports(walls(near)) + walls(teeth + mouth) + room(sent) + hush() + whine()


# The left channel sounds dull at the top. Each row: frequency in Hz, gain in dB.
LEFT_COLOUR = [(11300, -1.5), (11900, -11), (14500, -15)]
EDGE_HZ = 15900  # upper band limit


def record(dry):
    """The dull top on the left, a soft ceiling on the hardest knocks, then the band limit."""
    colour = gain_of(read(LEFT_COLOUR, np.fft.rfftfreq(N, 1 / SR)))
    left = irfft(rfft(dry[0]) * colour, N)
    held = .9 * np.tanh(np.array([left, dry[1]]) / .9)
    band_limit = signal.firwin(511, EDGE_HZ, window=("kaiser", 9), fs=SR)
    return signal.oaconvolve(held, band_limit[None], "same")


dry = scene()
out = record(dry)
wav_record(out)
```